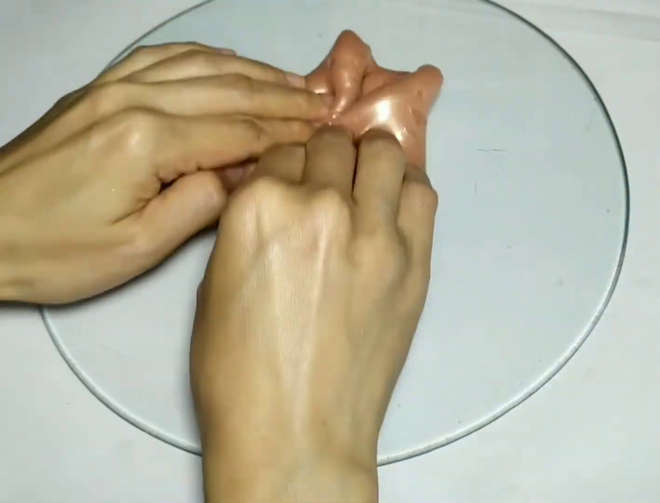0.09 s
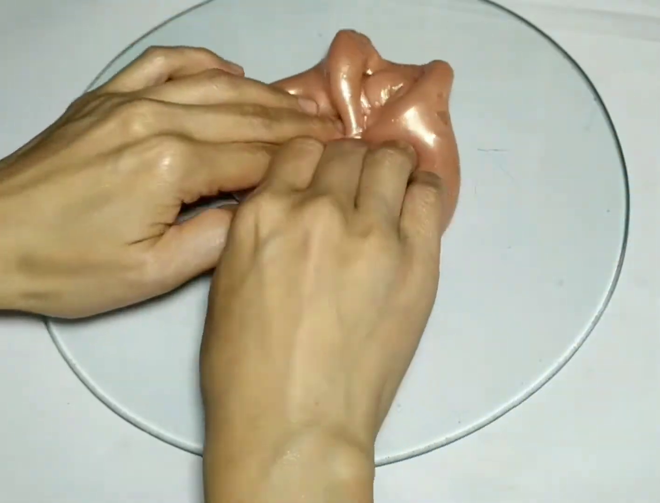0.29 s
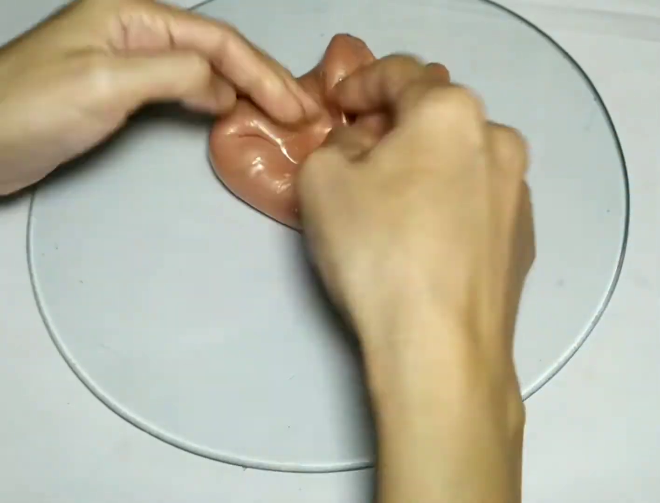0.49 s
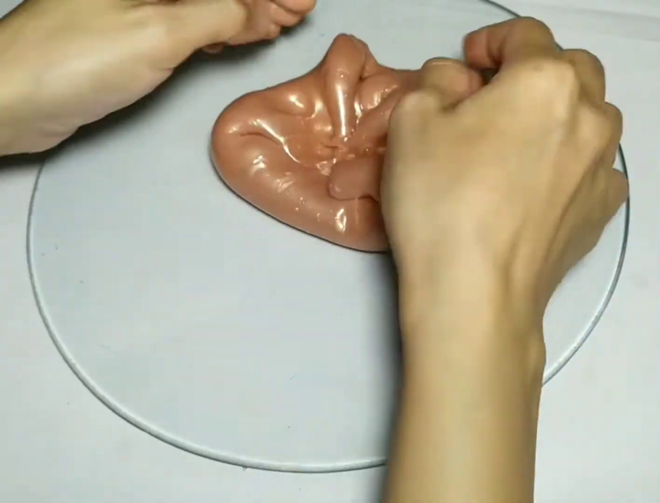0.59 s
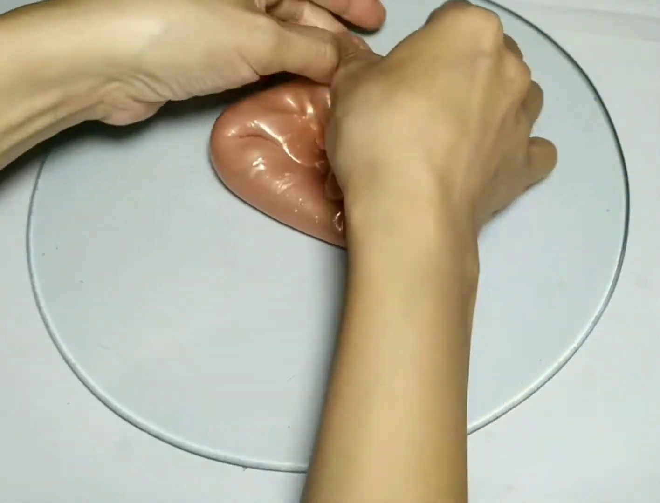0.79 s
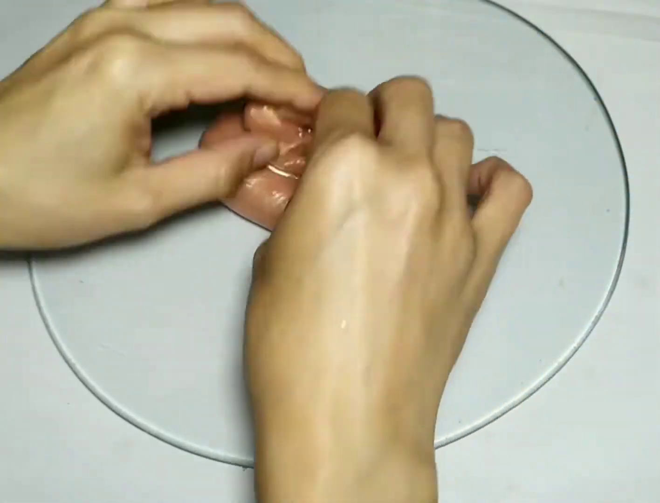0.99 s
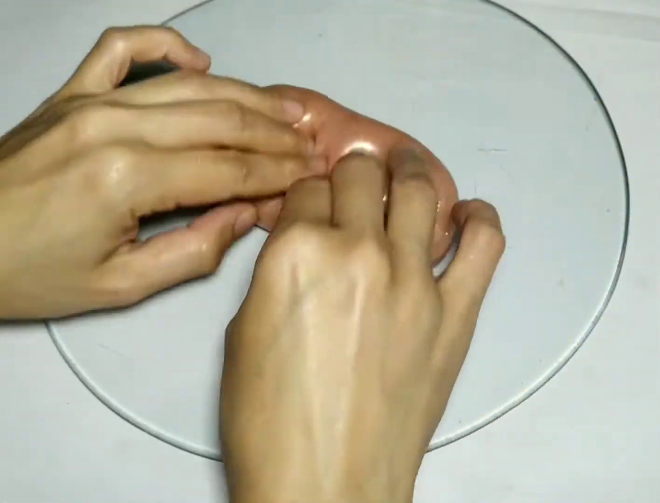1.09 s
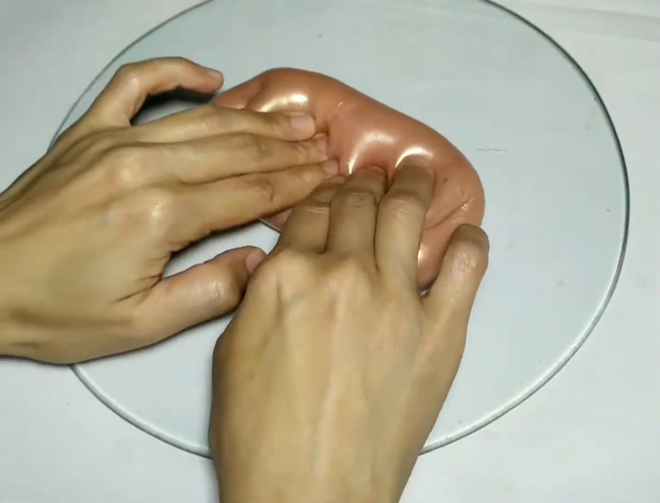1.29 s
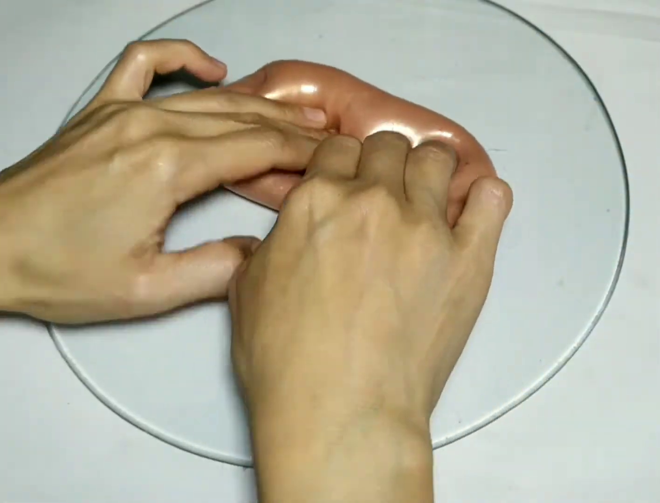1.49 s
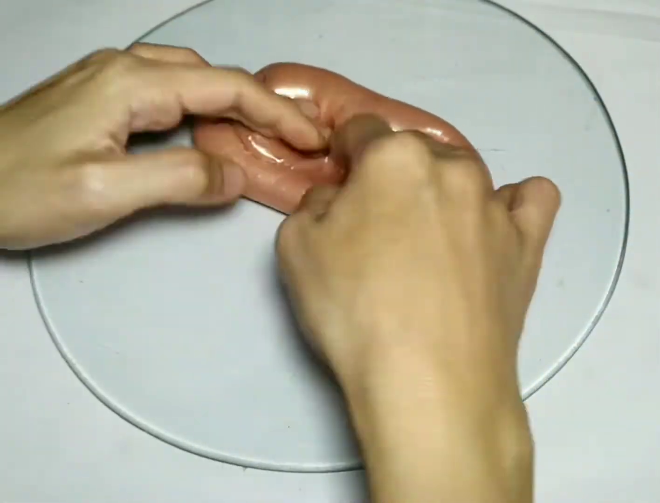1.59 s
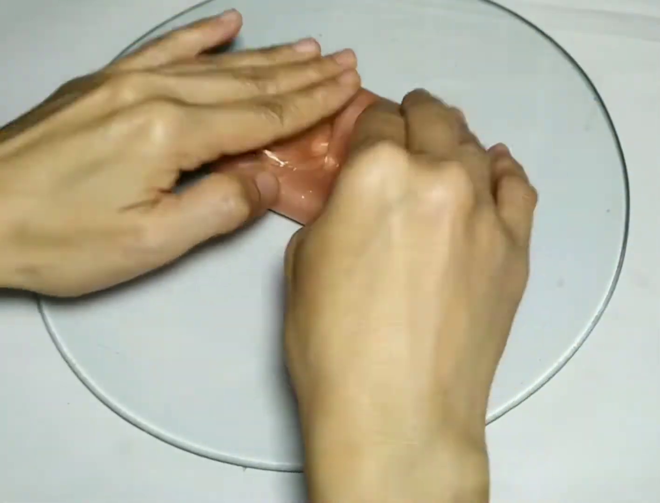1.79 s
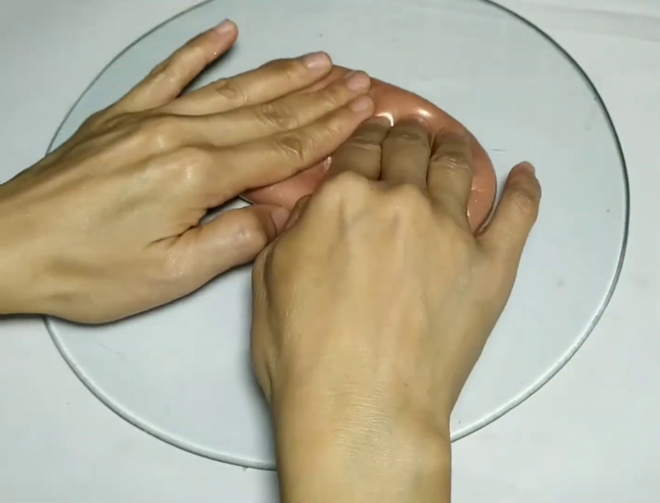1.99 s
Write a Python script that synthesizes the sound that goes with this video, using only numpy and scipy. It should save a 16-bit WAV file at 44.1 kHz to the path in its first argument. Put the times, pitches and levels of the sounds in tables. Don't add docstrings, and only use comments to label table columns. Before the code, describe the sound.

Hands fold gooey slime in a small quiet room, miked closely by two spaced microphones: a sharp bright snap near the start, faint sticky ticks and low finger thuds, then a strong wet crackling pop later.

```python
import sys
import numpy as np
from scipy import signal
from scipy.fft import rfft, irfft
from scipy.io import wavfile
from scipy.ndimage import uniform_filter1d

SR = 44100
rng = np.random.default_rng(int(sys.argv[2]) if len(sys.argv) > 2 else 0)


def dump_mix(stems):
    frames = np.atleast_2d(stems).T
    limited = np.clip(frames, -1, 1)
    pcm = np.round(limited * 32767).astype(np.int16)
    wavfile.write(sys.argv[1], SR, pcm)


def boost_factor(decibels):
    exponent = np.asarray(decibels, float) / 20
    return 10 ** exponent


N = 92610


def level(x, db):
    return x * boost_factor(db) / np.sqrt(np.mean(x ** 2))


def colour(x, points):
    freq = np.fft.rfftfreq(x.shape[-1], 1 / SR) + 1e-3
    hz, db = np.array(points, float).T
    gain_db = np.interp(np.log(freq), np.log(hz), db, -90, -90)
    return irfft(rfft(x) * boost_factor(gain_db), x.shape[-1])


def band(x, hz, width_hz):
    hz = min(hz, .45 * SR)
    return signal.lfilter(*signal.iirpeak(hz, hz / width_hz, SR), x)


def high_pass(x, hz, order):
    return signal.sosfilt(signal.butter(order, hz, "high", fs=SR, output="sos"), x)


def walk(rate_hz):
    hold = int(SR / rate_hz)
    steps = np.repeat(rng.standard_normal(N // hold + 1), hold)
    drift = uniform_filter1d(uniform_filter1d(steps, hold), hold)[:N]
    return drift / drift.std()


def ears(pan_db):
    return [(0, boost_factor(pan_db / 2), 1), (.0005, boost_factor(-pan_db / 2), RIGHT_BRIGHT)]


RIGHT_BRIGHT = 1.3

# pitch_hz, level_db (per Hz)
HISS_COLOUR = [(410, -35), (700, -4.5), (1040, -4.5), (1240, -6.5), (1340, -4), (1780, -4.5), (15200, -7.5),
               (16900, -26.5)]


def hiss():
    noise = level(colour(rng.standard_normal((2, N)), HISS_COLOUR), -65.5)
    freq, spectrum = np.fft.rfftfreq(N, 1 / SR), rfft(noise)
    edges_hz = [300, 1500, 3000, 5000, 7500, 10000, 12500, 15900]
    out = 0
    for low, high in zip(edges_hz, edges_hz[1:]):
        part = irfft(spectrum * ((freq >= low) & (freq < high)), N)
        out = out + part * boost_factor(.58 * walk(5.2))
    return out


# pitch_hz, level_db (per Hz)
RUMBLE_COLOUR = [(15, -66), (25, -28), (47, -8.5), (69, 1), (118, -12), (161, -7), (356, -23.5), (405, -25),
                 (1200, -42.5), (1560, -67), (2640, -120)]
# pitch_hz, width_hz, level_db
ROOM_BOOMS = [
    (61.2, 7, -57.5),
    (168.8, 30, -61.5),
]


def rumble(t):
    rumble_db, alike_hz = -51.5, 700
    mid, side = colour(rng.standard_normal((2, N)), RUMBLE_COLOUR)
    mid = level(mid, rumble_db) * boost_factor(walk(3.92))
    side = high_pass(side, alike_hz, 1) + .16 * side
    side = side * boost_factor(rumble_db - 2) / np.std(colour(rng.standard_normal(N), RUMBLE_COLOUR))
    for hz, width_hz, db in ROOM_BOOMS:
        boom = band(band(rng.standard_normal(N), hz, width_hz), hz, width_hz)
        fade_db = -4.5 * (t - 1) * (hz > 100)
        mid = mid + level(boom, db) * boost_factor(fade_db)
    mid = high_pass(mid, 42, 2)
    return np.array([mid + side, mid - side]) * boost_factor(np.array([[.2], [-.2]]))


# delay_s, level_db
FIRST_ECHOES = [
    [(.0112, -14), (.0147, -12), (.0173, -8), (.0179, -11), (.019, -15), (.036, -19)],
    [(.009, -12), (.0145, -13), (.0176, -17), (.024, -21), (.0345, -14), (.045, -22)],
]
# pitch_hz, fall_s
ROOM_FALL = [(300, 0.99), (1300, 0.39), (3500, 0.46), (9000, 0.28), (16000, .25)]


def room(x):
    tail_db, build_s, smear_s = -1.5, .0075, .00006
    u = np.arange(SR // 2) / SR
    fall_hz, fall_s = np.array(ROOM_FALL).T
    noise = rfft(rng.standard_normal((2, len(u))))
    octave = np.log2(np.fft.rfftfreq(len(u), 1 / SR) + 1)
    tail = 0
    for hz in 200 * 2 ** np.arange(0, 6.6, .5):
        share = np.clip(1 - 2 * np.abs(octave - np.log2(hz)), 0, 1)
        t60 = np.interp(np.log(hz), np.log(fall_hz), fall_s)
        tail = tail + irfft(noise * share, len(u)) * boost_factor(-60 * u / t60)
    tail = tail * (1 - np.exp(-(u / build_s) ** 2))
    tail = boost_factor(tail_db) * tail / np.sqrt(np.sum(tail ** 2) / 2)

    early = np.zeros((2, len(u)))
    grit = 1 + .41 * rng.standard_normal((2, len(u)))
    for c in range(2):
        for s, db in FIRST_ECHOES[c]:
            bump = grit[c] * np.sign(u - s + 1e-6) * np.exp(-np.abs(u - s) / smear_s)
            early[c] += boost_factor(db) * bump / np.sqrt(np.sum(bump ** 2))
    return signal.fftconvolve(x, early + tail, axes=1)[:, :N]


def ring(u, hz, t60, rise_s, glide):
    age = np.maximum(u, 0) / t60
    swell = 1 - np.exp(-age * t60 / rise_s)
    tone = np.sin(2 * np.pi * hz * u * (1 + glide * np.minimum(age, 1)))
    return swell * boost_factor(-60 * age ** 1.39) * tone


# start_s, level_db (peak), pitch_hz, ring_s (to fall 60 dB)
FINGER_THUDS = [
    (.714, -38, 87, 0.1),
    (.48, -50, 91, 0.16),
    (1.895, -47.5, 93, 0.075),
]


def thuds(t):
    return sum(2 * boost_factor(db) * ring(t - s, hz, t60, .0071, 0) for s, db, hz, t60 in FINGER_THUDS)


# start_s, level_db (peak), pitch_hz, ring_s (to fall 60 dB), left_right_db
HOLLOW_POPS = [(.183, -50.5, 1000, 0.009, 4), (.468, -50, 1700, 0.013, 2), (0.5003, -41.5, 993, .016, 4),
               (1.189, -54, 910, .009, 0), (1.385, -51, 1300, 0.0051, 0), (1.405, -61, 2000, 0.011, 4),
               (1.645, -35, 810, 0.0078, 0), (1.654, -30.5, 1128, 0.01, 8), (1.657, -24.5, 1000, 0.016, 1),
               (1.6575, -38.5, 700, 0.031, 8.5), (1.657, -43, 481, 0.0294, -2), (1.663, -43, 960, 0.01, 3),
               (1.699, -48, 887, 0.027, 0)]


def pops(t):
    out = np.zeros((2, N))
    for s, db, hz, t60, pan_db in HOLLOW_POPS:
        for c, (lag, gain, _) in enumerate(ears(pan_db)):
            out[c] += 2 * boost_factor(db) * gain * ring(t - s - lag * .3, hz, t60, .0012, .05)
    return out


PEEL_PEAKS = [.2375, .469, .520, 1.1765, 1.200, 1.612, 1.645, 1.6535, 2.1, .97, 1.61, .495, .183, 1.41,
              .716, 1.672, 1.6575, 1.26, 1.149, 1.55, .452, 1.74, 1.2005, 1.65]
# pitch_hz, rise_s, fall_s, level_db, left_right_db
PEEL_SWARMS = [(10000, .0022, .0025, -28, -20), (8000, .003, .01, -49, 0), (6800, .025, .02, -45, 0),
               (9500, .002, .002, -46, 6), (11000, .002, .002, -38, 5), (8000, .012, .02, -49, 0),
               (5500, .007, .01, -37, 0), (6500, .0008, .002, -28, -1), (3500, .07, .05, -62, 0),
               (9000, .1, .08, -68, 0), (1600, .012, .03, -54, 0), (650, .035, .035, -52, 0),
               (1300, .004, .008, -56, 0), (2000, .04, .04, -66, 0), (2500, .004, .006, -60, 0),
               (5000, .008, .012, -42, 0), (5000, .0006, .002, -29, -2), (3000, .03, .03, -66, 0),
               (7000, .0006, .003, -48, -1), (9000, .06, .03, -66, 0), (10000, .01, .01, -60, 0),
               (2500, .03, .04, -62, 0), (2200, .001, .0015, -48, 3), (1700, .012, .022, -38, 0)]


def peels(t):
    ticks_per_s, scatter_db, width = 7000, 3.5, 1.5
    out = np.zeros((2, N))
    for s, (hz, rise_s, fall_s, db, pan_db) in zip(PEEL_PEAKS, PEEL_SWARMS):
        happens = rng.random((2, N)) < ticks_per_s / SR
        strength = boost_factor(scatter_db * np.minimum(rng.exponential(size=(2, N)), 2.5))
        ticks = happens * strength * np.sign(rng.standard_normal((2, N)))
        ticks = band(band(ticks, hz, hz * width), hz, hz * width)
        ticks = high_pass(ticks, hz * .62, 3)
        swell = np.exp(-((t - s) / rise_s) ** 2)
        shape = np.where(t < s, swell, np.exp(-np.abs(t - s) / fall_s))
        out += level(ticks, db) * shape * boost_factor(np.array([[pan_db], [-pan_db]]) / 2)
    return out


# start_s, level_db (peak), pitch_hz, left_right_db, room_db (sent into the room)
FILM_SNAPS = [
    (.23875, 0, 9300, 2, 0),
    (.4685, -34, 7000, 0, -8),
    (.4735, -38, 6400, 0, -8),
    (.5665, -42, 14000, 0, -8),
    (.571, -43, 14000, 0, -8),
    (.716, -50, 5000, 0, -8),
    (1.1485, -33, 10500, -1, -8),
    (1.2875, -48, 8000, 0, -8),
    (1.6533, -21, 6500, -1, -14),
    (1.6572, -21, 4000, -3, -14),
]


def snaps(t):
    rise_cycles, fall_cycles = .8, 2.0
    tick_db, tick_s = -17.5, .00009
    spray_db, spray_s, spray_bright = -8, .0012, 1.25
    out, to_room = np.zeros((2, N)), np.zeros(N)
    for s, db, hz, pan_db, room_db in FILM_SNAPS:
        tick = np.exp(-((t - s) / tick_s) ** 2)
        for c, (lag, gain, bright) in enumerate(ears(pan_db)):
            u, f = t - s - lag, min(hz * bright, 15500)
            cycles = np.where(u < 0, rise_cycles, fall_cycles)
            tone = np.exp(-(u * f / cycles) ** 2) * np.cos(2 * np.pi * f * u)
            spray = band(rng.standard_normal(N), f * spray_bright, f)
            spray = spray * (u > 0) * np.exp(-np.abs(u) / spray_s)
            burst = tone + boost_factor(tick_db) * tick + boost_factor(spray_db) * spray
            out[c] += boost_factor(db - pan_db / 2) * gain * burst
        u = (t - s) * hz * RIGHT_BRIGHT
        to_room += boost_factor(db + room_db + 5.5) * np.exp(-(u / .51) ** 2) * np.sin(2 * np.pi * u)
    return out, to_room


# pitch_hz, level_db
ROOM_ANSWER = [(20, -8), (1000, -5.5), (2500, -9.5), (4500, -9), (7000, -2), (15500, 1.5), (17000, -27),
               (22050, -37)]


def scene():
    t = np.arange(N) / SR
    background = rumble(t) + hiss()
    hollow, swarms = pops(t), peels(t)
    bursts, clicks = snaps(t)
    echoes = room(clicks + boost_factor(-9) * swarms + boost_factor(-12) * hollow)
    return background + colour(echoes, ROOM_ANSWER) + thuds(t) + hollow + swarms + bursts


def band_limit(x):
    return signal.sosfilt(signal.butter(12, 17030, fs=SR, output="sos"), x)


def record(dry):
    dulled = signal.sosfilt(signal.cheby2(8, 24, 16260, fs=SR, output="sos"), dry)
    return band_limit(np.clip(dulled, -1, 1))


dry = scene()
out = record(dry)
dump_mix(out)
```